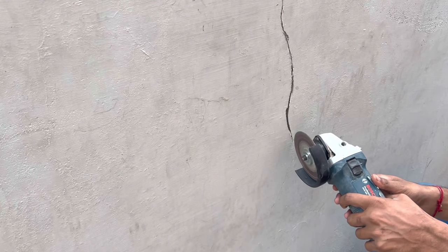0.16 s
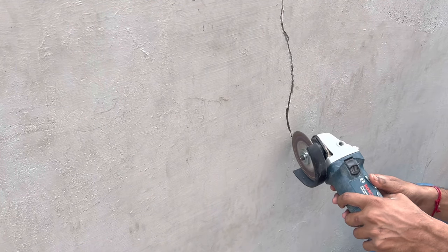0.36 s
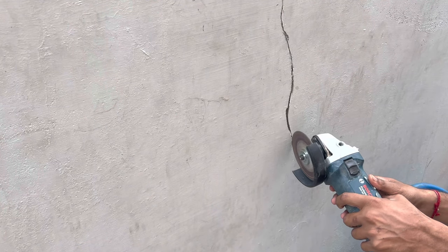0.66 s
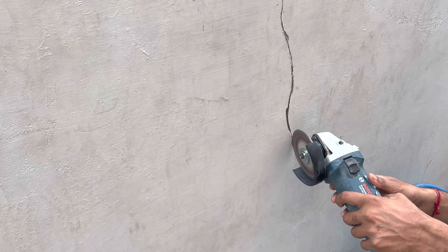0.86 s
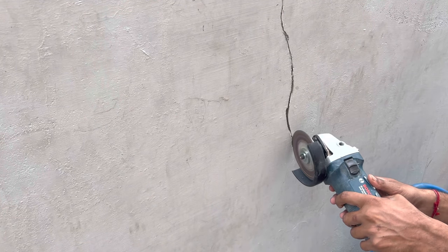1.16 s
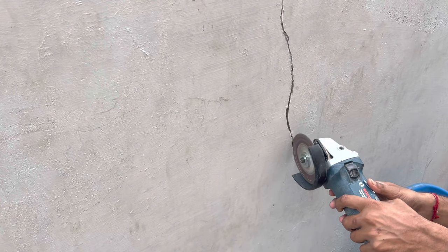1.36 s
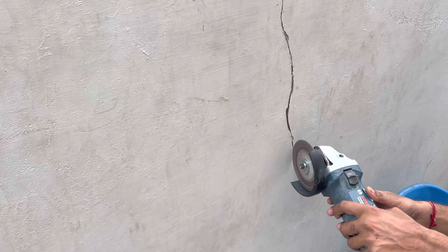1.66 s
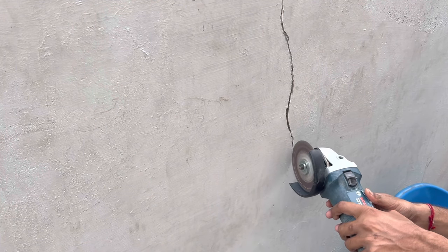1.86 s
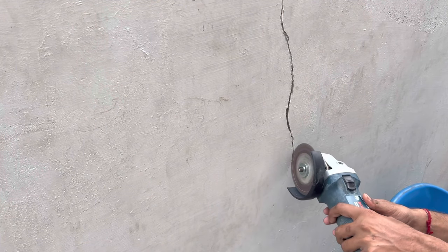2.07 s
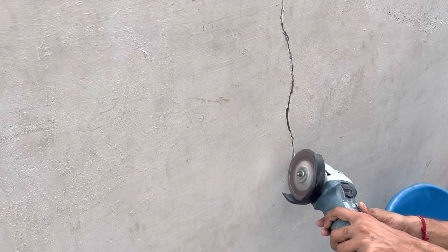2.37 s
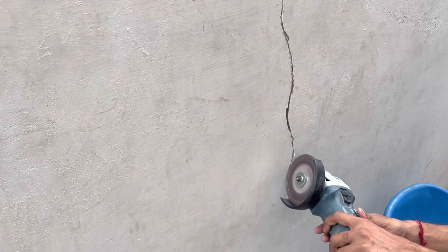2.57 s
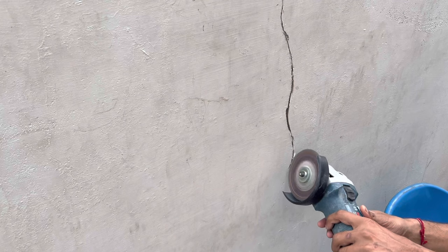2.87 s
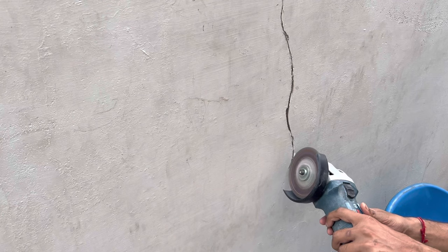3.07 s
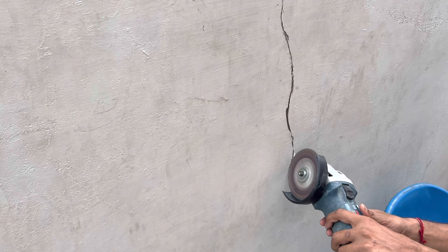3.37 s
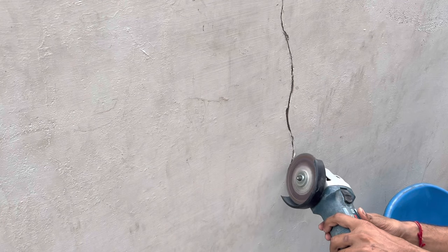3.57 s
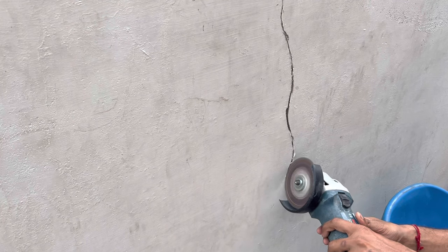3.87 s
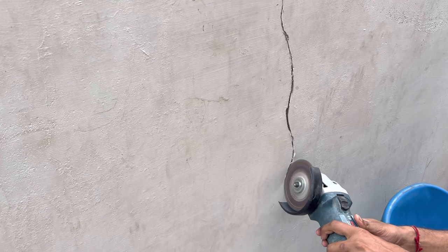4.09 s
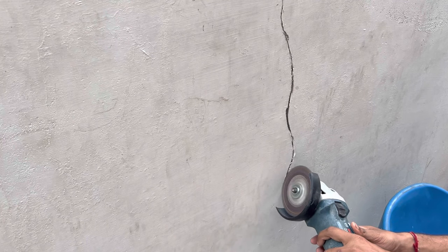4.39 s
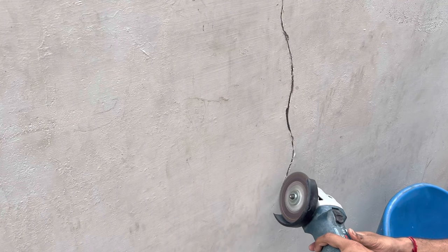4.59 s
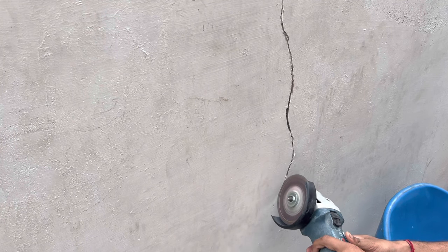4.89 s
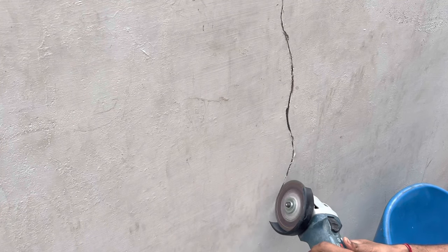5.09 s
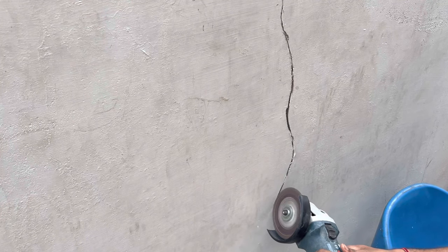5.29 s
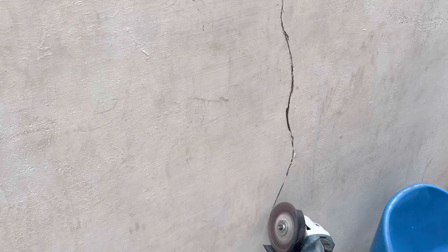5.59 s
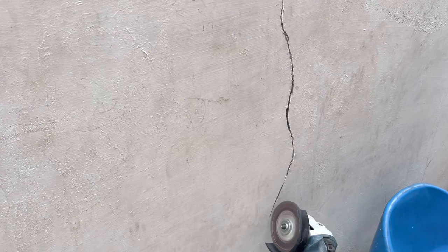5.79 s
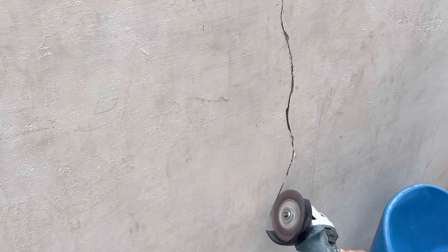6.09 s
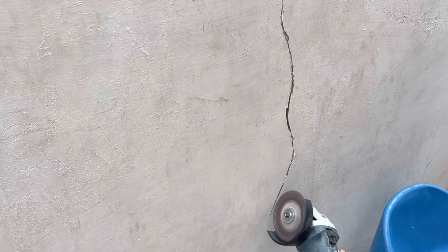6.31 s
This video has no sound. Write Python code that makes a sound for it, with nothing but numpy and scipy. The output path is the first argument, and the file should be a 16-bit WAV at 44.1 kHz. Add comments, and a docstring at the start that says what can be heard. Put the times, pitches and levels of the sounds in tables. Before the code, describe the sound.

Close and dry, a grinder's whirring motor and rushing fan never stop. Two long abrasive passes along a wall crack bring sizzling grit, ringing guard and disc, and thin squeals, while the motor pitch drops slightly. Between them the speed climbs back and only small scuffs are heard. After the second pass the tool spins freely, then grazes the wall once more. The sound is mono, treble-heavy and has almost no bass.

```python
"""An electric angle grinder: the motor whines and its fan hisses throughout, as shaft-locked tones and noise.
The disc is fed along a crack in a plastered wall in two long passes, at a lower motor speed under load.
Grit, partly alike on every turn, scrapes and rings guard and disc; grazes, hard grains and soft bumps intrude.
After the second pass the speed recovers, and a brief touch comes near the end. The sound is mono."""
import sys
import numpy as np
from scipy import signal
from scipy.fft import rfft, irfft, next_fast_len
from scipy.io import wavfile
from scipy.ndimage import map_coordinates

SR = 44100
rng = np.random.default_rng(int(sys.argv[2]) if len(sys.argv) > 2 else 0)


def output_pcm(signal):
    """Save a mono or channel-first signal as 16-bit PCM at the path in sys.argv[1].

    Samples are clipped to [-1, 1] before scaling.
    """
    pcm = np.clip(np.atleast_2d(signal).T, -1, 1) * 32767
    wavfile.write(sys.argv[1], SR, np.round(pcm).astype(np.int16))


N = 284435

# Resonances of the steel guard. Each row: centre in Hz, width in Hz before spreading, relative level in dB.
GUARD = [(3560, 75, -9.5), (3872, 80, -3.6), (4070, 70, -16), (4630, 52, -1.5), (4835, 42, -7),
         (4940, 58, -0.3)]
GEAR = 9 / 32  # spindle turns per motor turn


def amp(db):
    """Decibels to gain."""
    return 10 ** (np.asarray(db) / 20)


def unit(x):
    """Scale to rms 1."""
    return x / np.sqrt(np.mean(x ** 2) + 1e-20)


def curves(rows):
    """One value per sample for each column after the time."""
    s, *cols = np.transpose(rows)
    return [np.interp(np.arange(N) / SR, s, c) for c in cols]


def wobble(rate_hz, size=16):
    """Smooth random curve through unit-variance knots, rate_hz of them a second."""
    knots = rng.standard_normal(int(N * rate_hz / SR) + 4)
    fine = np.arange(len(knots) * size) / size
    return np.interp(np.arange(N) * rate_hz / SR, fine, map_coordinates(knots, [fine]))


def filtered(x, response):
    """Multiply the spectrum of x by a response of frequency."""
    m = next_fast_len(N + 8192)
    return irfft(rfft(x, m) * response(np.fft.rfftfreq(m, 1 / SR)), m)[:N]


def coloured(x, points):
    """x through a (Hz, dB) gain curve, at rms 1."""
    hz, db = np.transpose(points)
    return unit(filtered(x, lambda f: amp(np.interp(np.log(f + 1), np.log(hz), db))))


def held(start_s, length_s, attack_s, release_s):
    """Envelope that builds up, holds and lets go with exponential time constants."""
    age_s = np.maximum(np.arange(N) / SR - start_s, 0)
    return (1 - np.exp(-age_s / attack_s)) * np.exp(-np.maximum(age_s - length_s, 0) / release_s)


def swell(start_s, peak_s):
    """Envelope that rises to 1 in peak_s and dies away."""
    age = np.maximum(np.arange(N) / SR - start_s, 0) / peak_s
    return age * np.exp(1 - age)


def rung(x, modes, drift_db, spread=1.5, flares=()):
    """x through steep-sided resonances, at rms 1; each swells and fades as the point of contact moves."""
    flare_s = 0.029  # time constant
    m = next_fast_len(N + 8192)
    f = np.fft.rfftfreq(m, 1 / SR)
    drive = rfft(x, m)
    total = 0
    for hz, width_hz, db in modes:
        level_db = db + drift_db * wobble(9)
        for start_s, length_s, flare_hz, boost_db in flares:
            if abs(flare_hz - hz) < width_hz:
                level_db = level_db + boost_db * held(start_s, length_s, flare_s, flare_s)
        damping = 1j * f * spread * width_hz
        bandpass = damping / (hz * hz - f * f + damping)
        total = total + amp(level_db) * irfft(drive * bandpass ** 2, m)[:N]
    return unit(total)


def grit(turns, repeat, wear_turns, runout_db, oval_db, lobes_db, chatter_db, size=280):
    """Contact force at rms 1: a grain pattern that recurs each turn and slowly wears into a new one."""
    lobes = 6  # high spots round the worn rim
    keep = np.exp(-1 / wear_turns)
    rim = rng.standard_normal((int(turns[-1]) + 2, size))
    state = keep * rng.standard_normal((1, size))
    rim = signal.lfilter([np.sqrt(1 - keep ** 2)], [1, -keep], rim, axis=0, zi=state)[0]
    worn = unit(map_coordinates(rim.ravel(), [turns * size]))
    force = np.sqrt(repeat) * worn + np.sqrt(1 - repeat) * rng.standard_normal(N)
    # off-centre: harder once a turn; warped: twice; unevenly worn: at every lobe
    angle = 2 * np.pi * turns
    bite_db = runout_db * np.cos(angle) + oval_db * np.cos(2 * angle) + lobes_db * np.cos(lobes * angle)
    return unit(force * amp(bite_db + chatter_db))


def whine(turns, orders):
    """Tones at multiples of one rotation or cycle, each a little unsteady in strength."""
    total = np.zeros(N)
    for order, db in orders:
        sine = np.sin(2 * np.pi * (order * turns + rng.random()))
        total += amp(db + 1.0 * wobble(25)) * np.sqrt(2) * sine
    return total


def drone(spindle_turns):
    """The spindle's fifth order through a housing hollow that it meets near idle speed."""
    # Each row: centre in Hz, width in Hz before spreading, relative level in dB.
    hollow = [(819, 28, 0)]
    tone = np.sin(2 * np.pi * 5 * spindle_turns)
    return amp(-87.5) * rung(tone, hollow, drift_db=0.5, spread=0.92)


def motor(turns):
    """Armature and spindle tones, field-coil hum, fan hiss in the housing, and gears that ring the guard."""
    # Each row: multiple of the motor shaft's speed, level in dB rms.
    motor_orders = [(1, -72.5), (4, -71.5), (5, -69), (7, -74), (12, -63.5)]
    # Each row: multiple of the spindle's speed, level in dB rms.
    spindle_orders = [(2, -89), (3, -97), (5, -88.5), (8, -80), (16, -72.5), (50, -64.5), (70, -71),
                      (80, -76)]
    # Fan hiss spectrum. Each row: frequency in Hz, relative gain in dB.
    fan_spectrum = [(25, -39), (65, -24), (110, -28.5), (230, -25.5), (450, -14.5), (680, -15),
                    (1200, -8.5), (2500, -1), (5500, 0.5), (8100, -0.5), (9800, -6.5), (11900, 1),
                    (14500, -5.5), (15400, -15.5)]
    # Hollows of the housing. Each row: centre in Hz, width in Hz before spreading, relative level in dB.
    housing_modes = [(710, 22, -14.5), (828, 48, -8), (1132, 79, -6.5), (1249, 117, -1.5), (1470, 136, -5),
                     (2240, 96, -0.5), (2565, 70, 0), (2828, 61, -3)]
    mains_hz, mains_db = 60, -97.5
    recede_db_per_s = 0.22  # the vents move away as the tool travels down the wall
    t = np.arange(N) / SR
    spindle_turns = turns * GEAR
    tones = whine(turns, motor_orders) + whine(spindle_turns, spindle_orders)
    hum = whine(mains_hz * t, [(1, mains_db)])
    hiss = amp(-46.5) * coloured(rng.standard_normal(N), fan_spectrum)
    hollows = amp(-64) * rung(rng.standard_normal(N), housing_modes, drift_db=2.5, spread=1.28)
    # the warped disc chops the air twice a turn
    chop_db = 0.8 * np.cos(4 * np.pi * spindle_turns)
    flicker_db = 0.65 * wobble(20) + 0.75 * wobble(220)
    air = amp(chop_db + flicker_db - recede_db_per_s * t) * (hiss + hollows)
    teeth = grit(spindle_turns, repeat=0.45, wear_turns=30, runout_db=3.2, oval_db=2.5, lobes_db=0,
                 chatter_db=wobble(36))
    guard_ring = rung(teeth, GUARD, drift_db=0.5, spread=1.8)
    return tones + drone(spindle_turns) + hum + air + amp(-56.5) * guard_ring


def feed(idle_face_db=-55, idle_rim_db=-59):
    """Drive in dB on guard, disc face, disc rim and rim squeal, from the power sum of all contacts."""
    # The disc runs in the crack. Each row: start in seconds, length in seconds, force in dB,
    # lean in dB (+ onto its face, - onto its rim).
    pass_rows = [(0.33, 1.88, -46, 0.58), (3.30, 1.972, -45, -0.5)]
    # The hands push harder for a moment. Columns as for the passes.
    push_rows = [(0.03, 0.058, -56, -6), (0.343, 0.065, -54, -8), (0.467, 0.125, -49, -4.5),
                 (0.56, 0.057, -45.5, 5), (0.77, 0.04, -43.5, 0), (0.8, 0.44, -44, 0.5),
                 (1.023, 0.074, -48, 5.5), (1.08, 0.15, -57, -5), (1.615, 0.63, -44.5, -0.5),
                 (1.868, 0.17, -43, 0), (2.1, 0.06, -54, -11), (2.214, 0.25, -58, -6),
                 (3.194, 0.048, -49, -3), (3.53, 0.57, -46.5, -1), (3.586, 0.06, -50, 3),
                 (3.716, 0.21, -50, -3.5), (3.926, 0.1, -47, 1), (4.13, 0.19, -46.5, 0.5),
                 (4.623, 0.59, -48, -1.5), (5.361, 0.14, -54, -11.5), (5.47, 0.15, -61, -7),
                 (6.273, 0.065, -45.5, -4)]
    # The disc grazes the wall and jolts only the guard. Each row: start in seconds, peak drive in dB.
    graze_rows = [(2.23, -39), (2.33, -49), (2.39, -48), (2.46, -47), (2.71, -51), (3.21, -46.5),
                  (5.41, -54), (5.59, -43), (5.73, -49), (6.18, -44), (6.30, -42)]
    enter_s, leave_s = 0.064, 0.14  # time constants: the disc sinks into the crack, eases out
    push_s, release_s = 0.022, 0.019  # time constants: the hands lean in, let go
    graze_peak_s = 0.016
    steady_db = -46
    guard_db, guard_growth = -44, 0.56  # drive at a steady cut; dB per dB of force
    depth_s, depth_growth = 0.9, 0.21  # groove depth lags the force; guard dB per dB of depth
    squeal_steady_db, squeal_growth, squeal_top_db = -56.5, 1.87, -46.5  # growth per dB on the rim; saturation

    contacts = [(held(s, length, enter_s, leave_s), db, lean) for s, length, db, lean in pass_rows]
    contacts += [(held(s, length, push_s, release_s), db, lean) for s, length, db, lean in push_rows]
    face = sum((amp(db + lean) * envelope) ** 2 for envelope, db, lean in contacts)
    rim = sum((amp(db - lean) * envelope) ** 2 for envelope, db, lean in contacts)
    # the plaster gives way unevenly, so the rim's bite flickers
    rim = rim * amp(0.5 * wobble(70)) ** 2
    face_db = 10 * np.log10(face + amp(idle_face_db) ** 2)
    rim_db = 10 * np.log10(rim + amp(idle_rim_db) ** 2)

    force_db = (face_db + rim_db) / 2 - steady_db
    keep = np.exp(-1 / (depth_s * SR))
    depth_db = signal.lfilter([1 - keep], [1, -keep], force_db, zi=force_db[:1])[0]
    shaken = amp(guard_db + guard_growth * force_db + depth_growth * depth_db)
    jolts = sum(amp(db) * swell(s, graze_peak_s) for s, db in graze_rows)
    squeal_db = np.minimum(squeal_steady_db + squeal_growth * (rim_db - steady_db), squeal_top_db)
    return 20 * np.log10(np.hypot(shaken, jolts)), face_db, rim_db, squeal_db


def catches(decay_60db_s=0.066, catch_db=-11, rise_s=0.006):
    """Scrape and squeal envelopes of short bursts where the rim hits a hard grain."""
    # Each row: start in seconds, burst level in dB before catch_db and the envelope,
    # squeal in dB relative to the burst.
    catch_rows = [(0.797, -31, 14), (1.185, -39, -6), (1.945, -26, -10), (3.338, -23, 2), (3.811, -29, 5),
                  (3.852, -28, 3), (3.94, -29, 8), (4.002, -31, 7), (4.7555, -32, 4), (5.1094, -29, -4),
                  (6.2876, -30, 3)]
    t, scrape, squeal = np.arange(N) / SR, np.zeros(N), np.zeros(N)
    for start_s, db, squeal_db in catch_rows:
        age_s = np.maximum(t - start_s, 0)
        burst = amp(db + catch_db - 60 * age_s / decay_60db_s) * (1 - np.exp(-age_s / rise_s))
        scrape += burst
        squeal += amp(squeal_db) * burst
    return scrape, squeal


def wavering(x, share, rate_hz):
    """x with its pitch wandering by a small share, as the pressure on the tool shifts."""
    return map_coordinates(x, [np.arange(N) + np.cumsum(share * wobble(rate_hz))], mode="mirror")


def cutting(turns, firm_db=-41, ring_growth=0.49):
    """Grit rings guard and disc; crumbling plaster adds a broad scrape and a fine sizzle."""
    # Disc, rim and squeal resonances. Each row: centre in Hz, width in Hz before spreading, relative level in dB.
    disc_modes = [(5300, 70, -9.5), (5932, 55, -5), (6240, 60, -14), (6415, 62, -6), (7310, 130, -0.9),
                  (8250, 70, -16), (8478, 58, -8.7), (9160, 57, -16)]
    rim_modes = [(10420, 80, 1), (10760, 100, -0.5), (11305, 62, -2), (11555, 50, -4), (13080, 130, -9),
                 (13850, 80, -8), (14200, 75, -6.5), (14750, 170, -11)]
    squeal_modes = [(12880, 55, 0)]
    # Scrape and sizzle spectra. Each row: frequency in Hz, relative gain in dB.
    scrape_spectrum = [(150, -30.5), (500, -20), (1500, -12.5), (3100, -9), (3800, -3.5), (5500, 2),
                       (7800, -0.5), (8600, -4), (9700, -26)]
    sizzle_spectrum = [(3000, -56), (10000, -18.5), (10500, 0.5), (11700, -3.5), (12500, 4.5),
                       (13300, -4.5), (14200, 3.5), (14500, -10), (15300, -14)]
    # One resonance rings out as the point of contact shifts. Each row: start in seconds, length in seconds,
    # resonance in Hz, boost in dB.
    flare_rows = [(0.47, 0.058, 3850, 6), (0.98, 0.049, 3850, 7), (1.88, 0.28, 4630, 3),
                  (1.3, 0.4, 4940, 2.5), (3.72, 0.51, 4940, 2.5), (1.48, 0.31, 5935, 8),
                  (4.25, 0.4, 5935, 3), (3.59, 0.062, 6415, 10), (3.76, 0.075, 6415, 11),
                  (0.99, 0.3, 7310, 2.5), (3.57, 0.083, 7310, 1.5), (4.23, 0.083, 7310, 3),
                  (0.5, 0.79, 8478, 6.5), (1.64, 0.36, 8478, 7), (0.47, 0.4, 12880, 2.5),
                  (3.45, 0.6, 12880, 4.5), (4.7, 0.8, 12880, 1)]
    judder_hz = 150

    guard_db, face_db, rim_db, squeal_db = feed()
    # the hand-held tool judders against the wall
    judder_db = 0.3 * wobble(25) + 1.45 * wobble(judder_hz)
    force = grit(turns, repeat=0.37, wear_turns=5, runout_db=2.3, oval_db=2.2, lobes_db=2.5,
                 chatter_db=judder_db)
    shake = grit(turns, repeat=0.3, wear_turns=4, runout_db=2.0, oval_db=2.2, lobes_db=2.5,
                 chatter_db=0.9 * judder_db)
    crumble = grit(turns, repeat=0.45, wear_turns=7.1, runout_db=2.4, oval_db=0.9, lobes_db=1.1,
                   chatter_db=judder_db + 1.1 * wobble(1500))
    burst, shriek = catches()

    def ringing(db):
        """Drive that falls off faster below firm_db: a light touch mostly scrapes."""
        return db + ring_growth * np.minimum(db - firm_db, 0)

    guard_ring = rung(shake, GUARD, drift_db=0.4, spread=1.9, flares=flare_rows)
    guard_ring = wavering(guard_ring, share=0.003, rate_hz=judder_hz)
    disc_ring = rung(force, disc_modes, drift_db=0.8, spread=1.3, flares=flare_rows)
    rim_ring = rung(force, rim_modes, drift_db=0.6, spread=1.6)
    squeal_ring = rung(force, squeal_modes, drift_db=0.7, spread=1.3, flares=flare_rows)

    guard = amp(guard_db - 2.5) * guard_ring
    disc = (amp(ringing(face_db) - 0.3) + 0.3 * burst) * disc_ring
    rim = (amp(ringing(rim_db) - 3.5) + 0.51 * burst) * rim_ring
    squeal = (amp(ringing(squeal_db) + 6) + shriek) * squeal_ring
    scrape = (amp(face_db - 7.0) + 0.8 * burst) * coloured(crumble, scrape_spectrum)
    sizzle = (amp(rim_db - 2.0) + burst) * coloured(crumble, sizzle_spectrum)
    # the unbalanced disc thrums once a turn, more when pressed to the wall
    thrum = (amp(-98) + amp(guard_db - 47)) * np.sin(2 * np.pi * turns)
    return guard + disc + rim + squeal + scrape + sizzle + thrum


def bumps():
    """A few soft low bumps: resonant noise under a short swell."""
    # Each row: start in seconds, pitch in Hz, width in Hz, peak of the envelope in dB.
    bump_rows = [(3.08, 62, 25, -83), (3.66, 174, 70, -84), (5.08, 205, 110, -77), (6.27, 160, 40, -87)]
    peak_s = 0.046
    total = np.zeros(N)
    for start_s, hz, width_hz, db in bump_rows:
        thud = rung(rng.standard_normal(N), [(hz, width_hz, 0)], drift_db=0, spread=1)
        total += amp(db) * swell(start_s, peak_s) * thud
    return total


def scene():
    """The motor drives the disc through a bevel gear; both channels carry the same sound."""
    # Each row: time in seconds, motor speed in turns per second before a slight random drift.
    speed_rows = [(0, 584.5), (0.5, 582.5), (0.8, 575.4), (1.2, 559.6), (1.6, 555.4), (2.2, 549.4),
                  (2.5, 559.0), (2.9, 570.7), (3.3, 575.0), (3.6, 570.5), (4.05, 556.2), (4.5, 550.0),
                  (5.3, 546.6), (5.6, 556.5), (6, 569.0), (6.45, 575.2)]
    speed_hz, = curves(speed_rows)
    turns = np.cumsum(speed_hz * (1 + 0.00084 * wobble(15))) / SR
    mono = motor(turns) + cutting(turns * GEAR) + bumps()
    return np.tile(mono, (2, 1))


def record(dry, notch_hz=10000, notch_width_hz=220, notch_db=-12, top_hz=15400):
    """The treble has one narrow dip and ends at a steep band limit."""
    def response(f):
        dip_db = notch_db / (1 + ((f - notch_hz) / notch_width_hz) ** 2)
        return amp(dip_db) * (f < top_hz)

    return np.array([filtered(channel, response) for channel in dry])


dry = scene()
out = record(dry)
output_pcm(out)
```